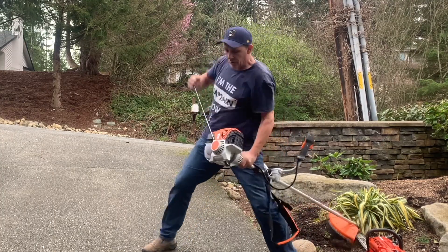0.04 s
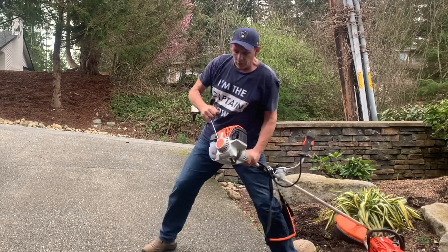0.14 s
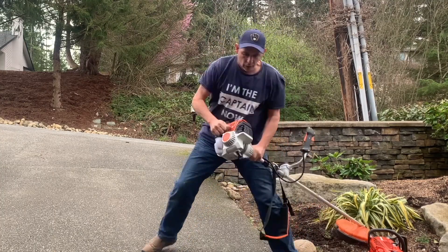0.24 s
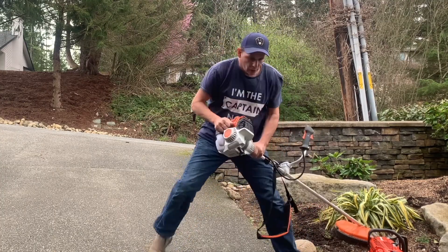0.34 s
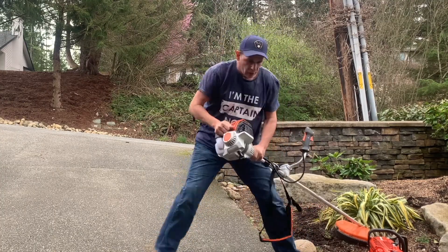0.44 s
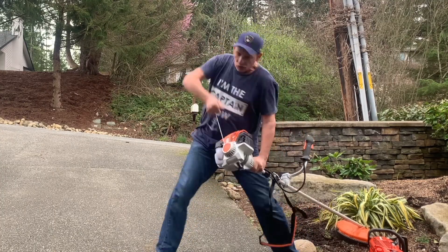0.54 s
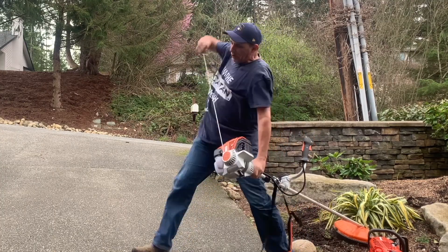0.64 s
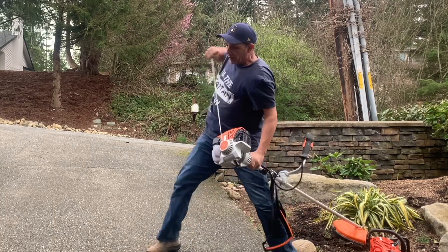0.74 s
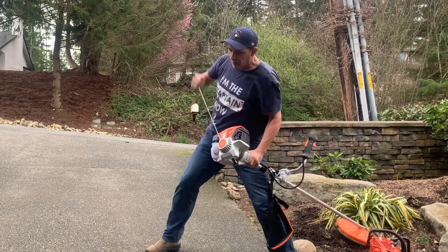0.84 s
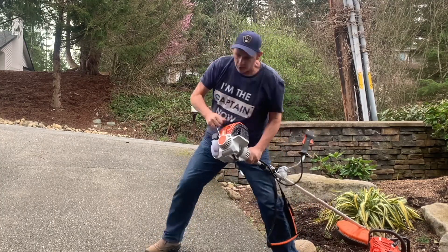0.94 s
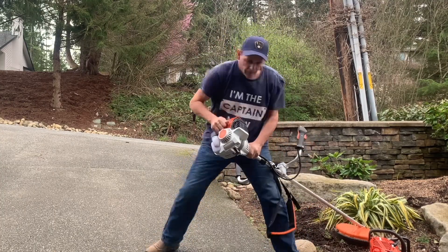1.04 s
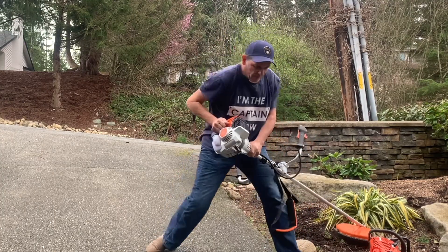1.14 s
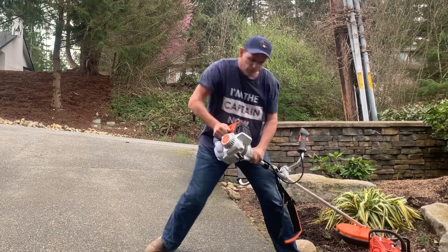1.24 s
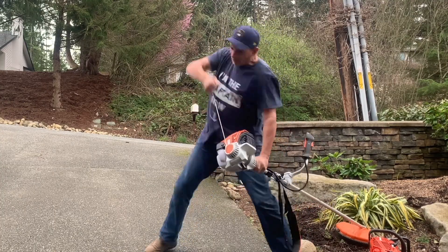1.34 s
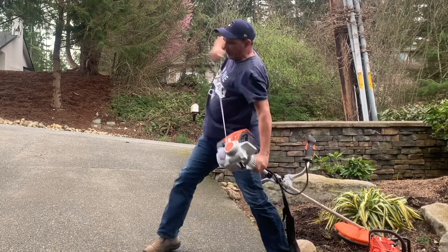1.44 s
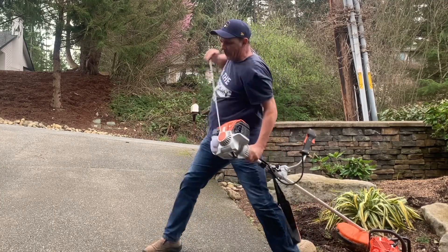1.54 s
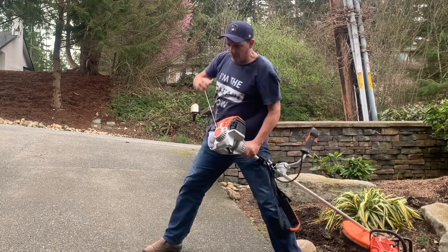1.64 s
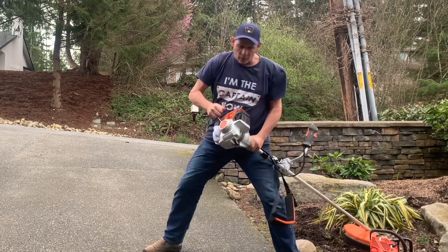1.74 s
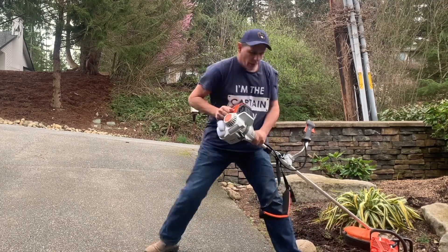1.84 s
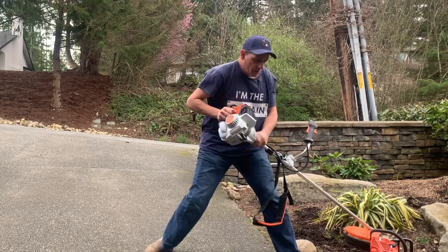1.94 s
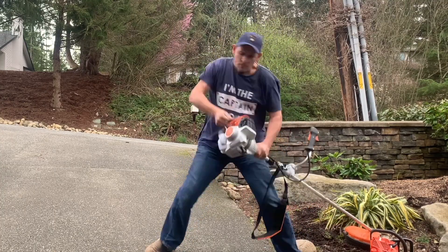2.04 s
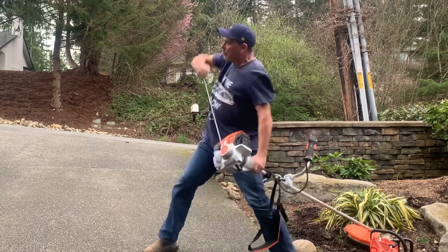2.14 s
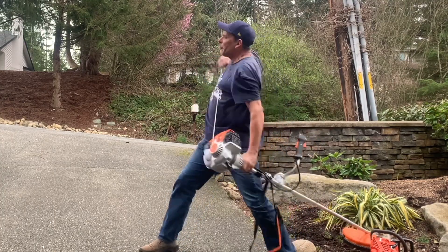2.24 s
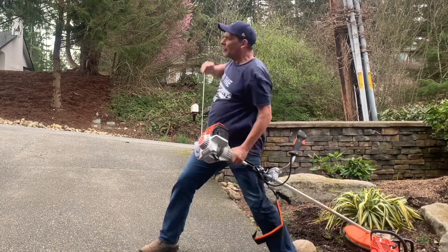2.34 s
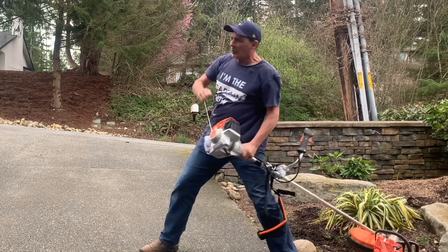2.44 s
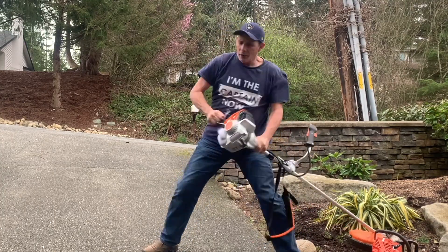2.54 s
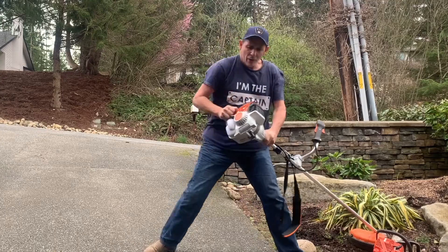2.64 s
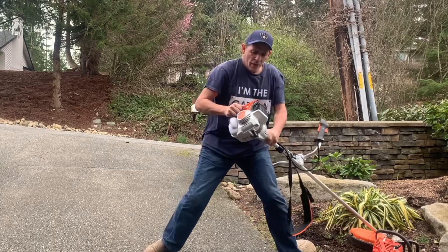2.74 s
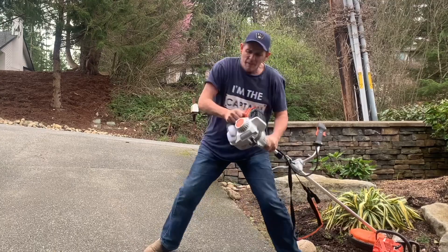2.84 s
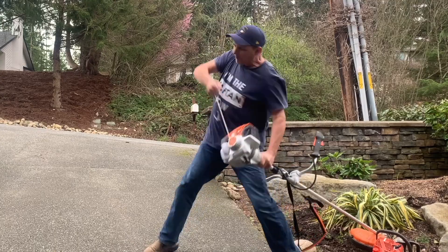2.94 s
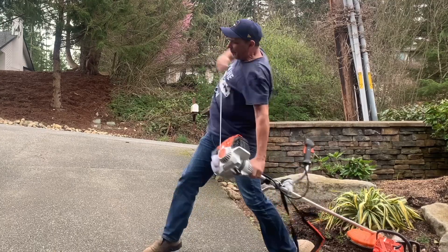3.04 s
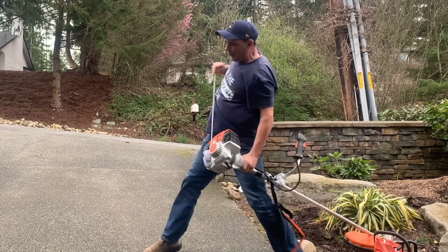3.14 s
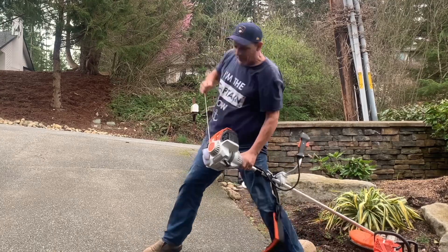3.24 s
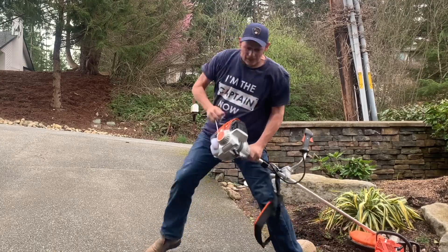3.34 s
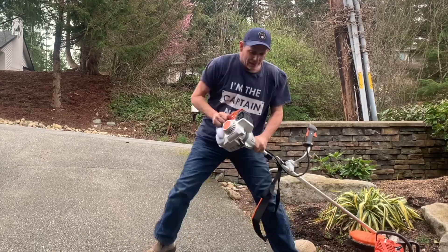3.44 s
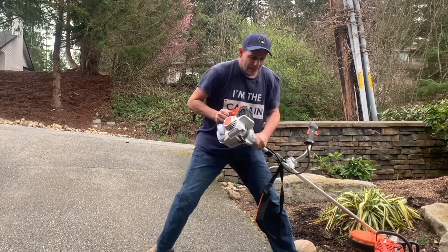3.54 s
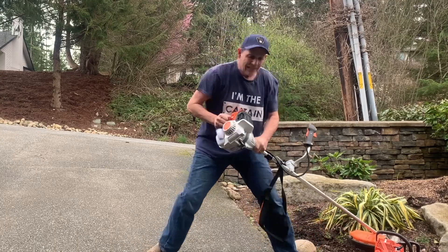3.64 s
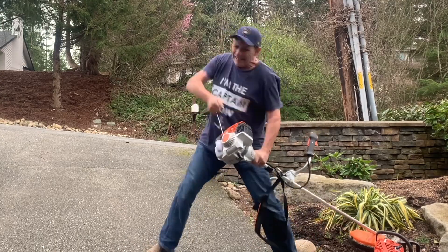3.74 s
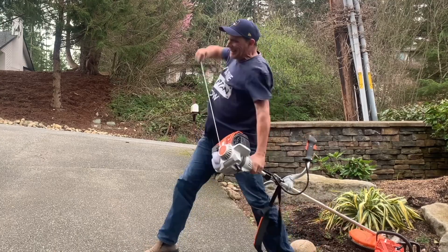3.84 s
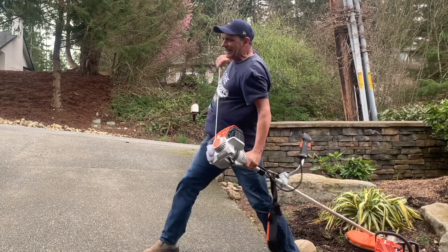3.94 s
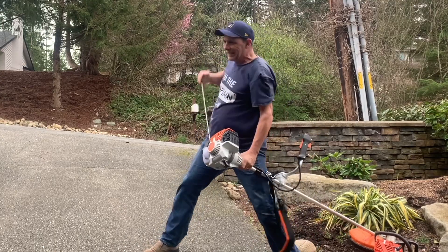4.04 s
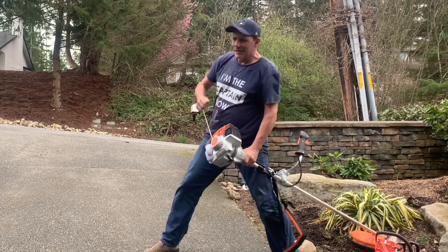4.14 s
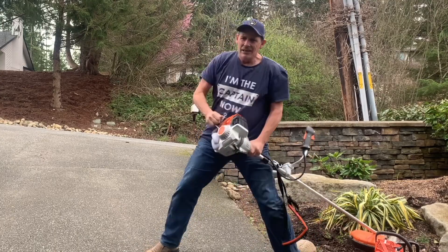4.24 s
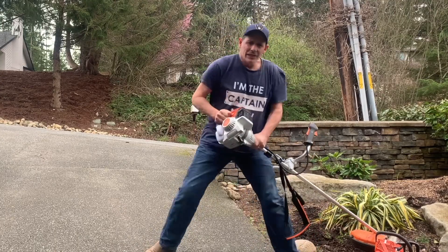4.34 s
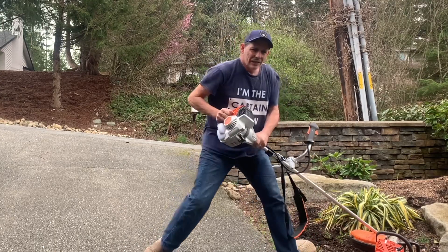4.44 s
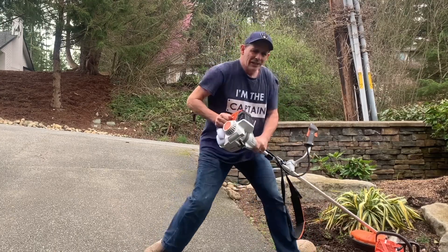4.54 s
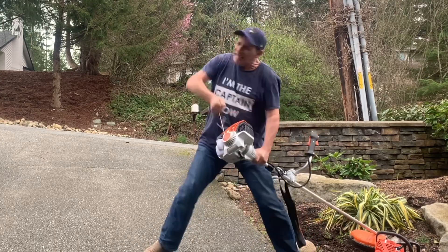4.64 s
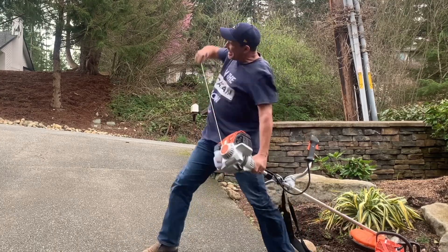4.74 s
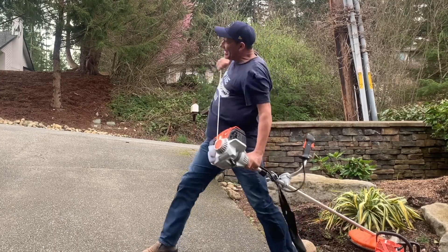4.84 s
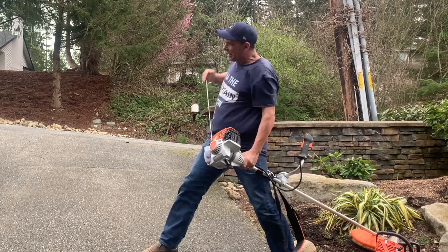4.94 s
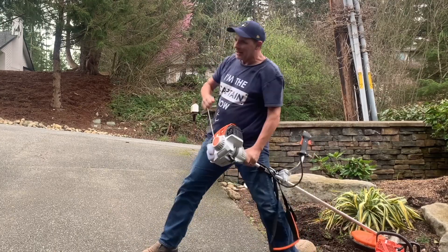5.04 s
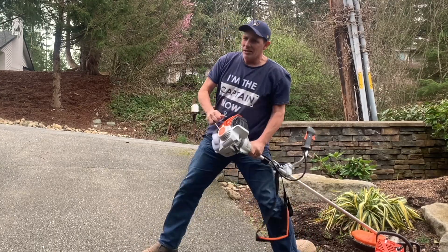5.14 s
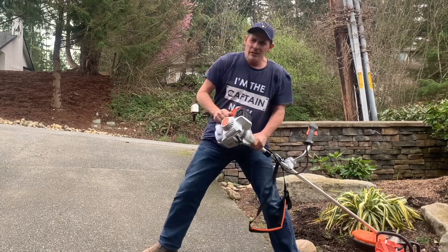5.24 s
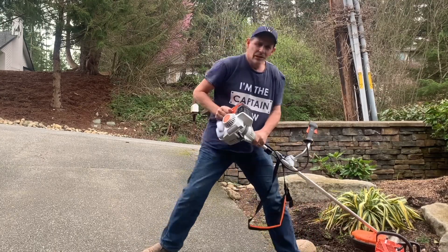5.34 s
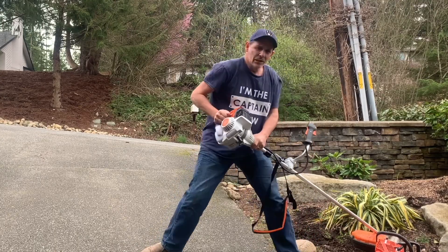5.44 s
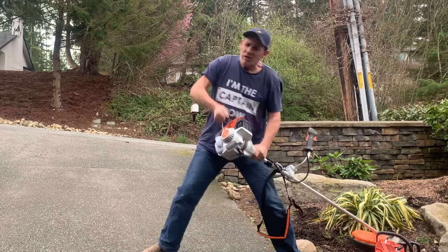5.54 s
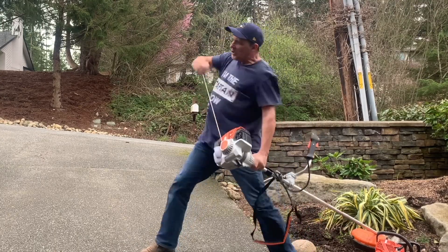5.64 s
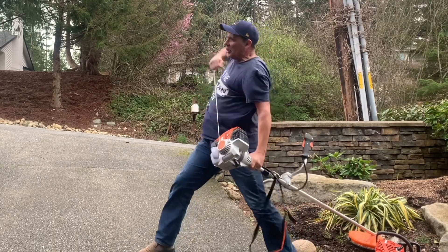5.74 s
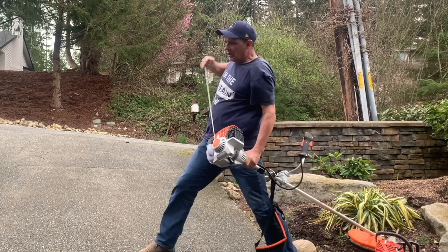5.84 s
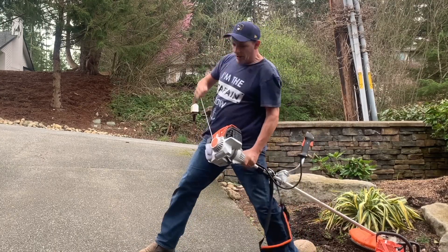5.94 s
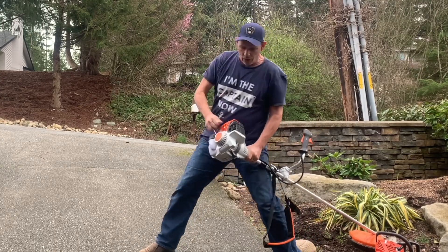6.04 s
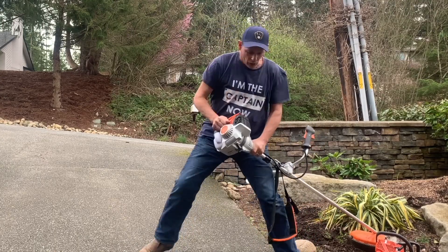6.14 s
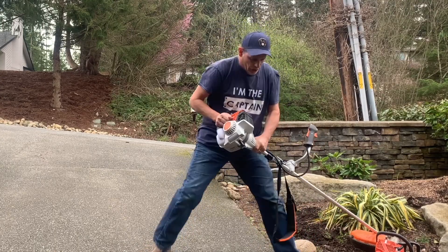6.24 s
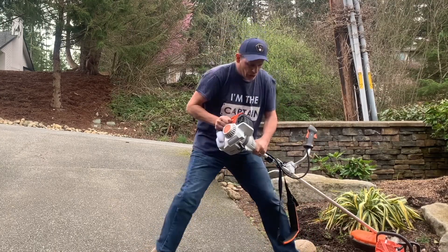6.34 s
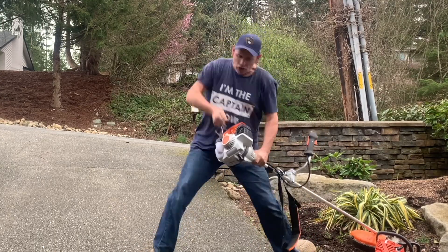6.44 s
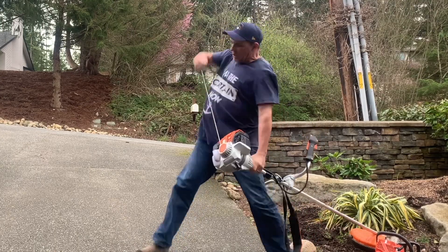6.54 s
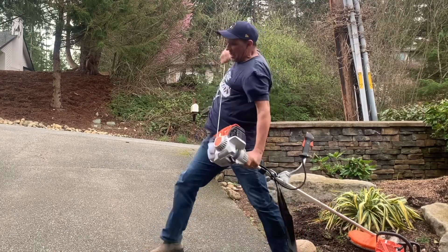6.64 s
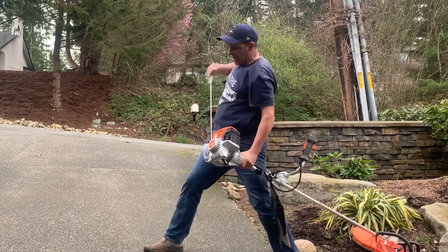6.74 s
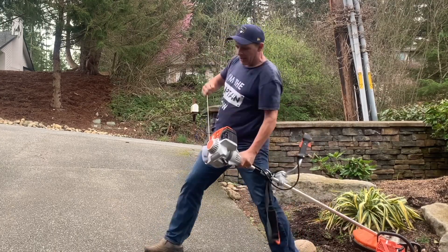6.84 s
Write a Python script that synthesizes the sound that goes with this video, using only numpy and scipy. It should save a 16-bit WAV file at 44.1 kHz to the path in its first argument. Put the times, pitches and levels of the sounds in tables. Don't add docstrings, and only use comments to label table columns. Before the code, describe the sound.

A recoil starter is yanked over and over on a driveway, heard by a phone a few steps away. Sharp catch, brief puffing crank and rope hiss, scraping release with a thin high metallic ring, then rewinding rattle, dull handle knocks and small clacks as hands shift. Later pulls are harder and louder. The engine stays dead; faint traffic rumble and one tiny bird whistle lie underneath.

```python
import sys
import numpy as np
from scipy import signal
from scipy.fft import rfft, irfft
from scipy.io import wavfile
from scipy.ndimage import uniform_filter1d

SR = 44100
rng = np.random.default_rng(int(sys.argv[2]) if len(sys.argv) > 2 else 0)


def rack_gain(trim_db):
    fader = np.asarray(trim_db, float)
    return 10 ** (fader / 20)


def to_wav(sig):
    pcm = np.clip(np.atleast_2d(sig), -1, 1) * 32767
    pcm = np.round(pcm).astype(np.int16)
    wavfile.write(sys.argv[1], SR, pcm.T)


N = 303408


def unit(x):
    return x / np.sqrt(np.mean(x ** 2))


def along(table, hz):
    f, v = np.transpose(table)
    return np.interp(np.log(hz + 20), np.log(f + 20), v)


def colour(x, spectrum):
    n = x.shape[-1]
    gain = rack_gain(along(spectrum, np.fft.rfftfreq(n, 1 / SR)))
    return irfft(rfft(x) * gain, n)


def resonate(x, hz, width):
    return signal.lfilter(*signal.iirpeak(hz, hz / width, fs=SR), x)


def body(x, modes):
    return sum((-1) ** k * rack_gain(db) * resonate(x, hz, width) for k, (hz, width, db) in enumerate(modes))


def walk(rate):
    k = int(SR / rate)
    held = rng.standard_normal(N)[np.arange(N) // k]
    return 1.3 * uniform_filter1d(uniform_filter1d(held, k), k)


def grains(spread_db, per_s):
    hit, size, sign = rng.random(N), rng.exponential(1, N), rng.standard_normal(N)
    return (hit < per_s / SR) * rack_gain(spread_db * np.minimum(size, 4)) * np.sign(sign)


def add(track, sound, s):
    i = int(s * SR)
    track[i:i + len(sound)] += sound[:len(track) - i]


# f/Hz, lead of the left port/rad
PORT_LEAD = [(0, -.15), (2000, -.6), (4500, 0), (6100, -.3), (8600, -np.pi), (13300, -3 * np.pi),
             (18000, -5 * np.pi)]


def lag(x):
    hz = np.fft.rfftfreq(N, 1 / SR)
    half = np.exp(.5j * np.interp(hz, *np.transpose(PORT_LEAD)))
    return irfft(rfft(x) * np.array([half, 1 / half]), N)


# f/Hz, scattered against direct level/dB
SURROUNDINGS = [(60, -20.5), (300, -2.5), (800, -3), (1300, -2), (2500, 4.5), (4000, 3.5), (4400, 3.5),
                (5100, 1), (6100, 5.5), (8000, -4), (16000, -2)]


def scatter(x, hop=8192):
    wet, t = np.zeros((2, N + 4 * hop)), np.arange(hop // 2) / SR
    padded = np.pad(colour(x, SURROUNDINGS), (hop, 2 * hop))
    decay = (1000 ** (-t / 0.021) + 0.15 * 1000 ** (-t / 0.5)) * (t > .0007)
    decay = decay / np.sqrt(np.sum(decay ** 2))
    for i in range(0, N + hop, hop):
        tail = rng.standard_normal((2, len(t))) * decay
        piece = signal.fftconvolve((padded[i:i + 2 * hop] * np.hanning(2 * hop))[None], tail)
        wet[:, i:i + piece.shape[1]] += piece
    return wet[:, hop:hop + N]


def ports(x):
    return lag(x) + scatter(x)


# f/Hz, level/dB per Hz
HUSH = [(25, -25), (45, -3), (240, -22), (400, -7.5), (1400, -18), (2800, -29), (4500, -18), (8000, -44),
        (15300, -31), (15900, -52)]
HUSH_DB = -65


def air():
    mid, side = colour(rng.standard_normal((2, N)), HUSH) * rack_gain(2.0 * walk(3.5))
    side = colour(side, [(60, 0.0), (1500, 10.5), (5000, 0), (8000, -3.5)])
    return rack_gain(HUSH_DB) * (lag(mid) + np.array([side, -side])) / np.std(mid)


# t/s, level/dB
TRAFFIC_SWELLS = [(0, -52), (.25, -53.5), (.4, -52), (.95, -58), (1.15, -64), (1.9, -57.5), (2.5, -50.5),
                  (2.8, -55.5), (3.3, -44.5), (3.6, -54.5), (4.301, -55.5), (4.5, -60), (5.2, -55.5),
                  (5.45, -54.5), (5.95, -60), (6.2, -49), (6.35, -55), (6.88, -71)]


def traffic():
    rumble = [(25, -30), (50, -1.5), (110, 1.5), (220, -1.5), (330, -5), (500, -39)]
    mid, side = colour(rng.standard_normal((2, N)), rumble)
    swell = rack_gain(np.interp(np.arange(N) / SR, *np.transpose(TRAFFIC_SWELLS)))
    return swell * (mid + 0.19 * np.array([side, -side])) / np.std(mid)


# t/s, f/Hz, level/dB
WHISTLE = [
    (1.14, 4500, -85),
    (1.165, 5330, -88),
    (1.185, 5300, -87),
    (1.197, 5370, -67),
    (1.21, 5230, -79),
    (1.225, 4930, -72),
]


def bird():
    s, hz, db = np.transpose(WHISTLE)
    t = np.arange(N) / SR
    phase = 2 * np.pi * np.cumsum(np.interp(t, s, hz)) / SR
    return rack_gain(np.interp(t, s, db, -120, -120)) * np.sin(phase)


# f/Hz, width/Hz, level/dB
HOUSING_MODES = [(453, 137, -8), (585, 95, -3), (700, 116, -6.5), (946, 250, -9.5), (1290, 320, -4.5),
                 (1265, 56, -19), (1944, 570, -18.5)]
# f/Hz, level/dB per Hz
CRACK_SPECTRUM = [(2000, -16.5), (3000, -12.5), (4200, -8), (5200, -14.5), (6300, -2), (7600, -2),
                  (9500, -2.5), (11000, -6), (14000, -7.5), (15500, -9), (16700, -42), (16900, -70)]


def blows(table, push_s, lead_s, lead_db, ring_width, housing, crack_lead=0.4):
    track, t = np.zeros(N), np.arange(4096) / SR - .02
    scrape = rack_gain(lead_db) * np.exp(-np.abs(t) / lead_s)
    push = np.where(t > 0, np.exp(-np.abs(t) / push_s), scrape)
    noises = rng.standard_normal((len(table), 2, len(t)))
    dull = signal.butter(2, 2800, fs=SR, output="sos")
    for (s, peak_db, hz, treble_db, *upper_hz), noise in zip(table, noises):
        contact = push * noise[0] + 2.0 * (np.abs(t) < .00012)
        thud = housing * resonate(body(contact, HOUSING_MODES), 1200.0, 2100.0)
        thud += 2.6 * resonate(contact, hz, ring_width)
        thud += sum(resonate(contact, f, ring_width) for f in upper_hz)
        thud -= resonate(thud, 250., 400.)
        thud = signal.sosfilt(dull, thud)
        crack = push * np.where(t > 0, 1, crack_lead) * colour(noise[1], CRACK_SPECTRUM)
        blow = thud / abs(thud).max() + rack_gain(treble_db - 1.5) * crack / abs(crack).max()
        add(track, rack_gain(peak_db) * blow, s - .02)
    return track


# t/s, peak level/dB, ring f/Hz, treble against peak level/dB
CLACK_EVENTS = [(0.129, -42, 533, -1), (0.341, -29, 1350, -14), (0.4555, -32, 1240, 9),
                (1.463, -22, 1331, -5), (1.529, -40, 636, 13.5), (1.799, -43, 527, 14),
                (2.361, -18, 1402, -9.5), (2.739, -17.5, 1020, -22), (3.069, -11.5, 1400, -25),
                (3.269, -26, 1180, -12), (3.478, -26, 1060, -33), (3.552, -25.5, 1070, -17),
                (3.919, -22, 1300, -31), (4.206, -44, 1100, 10), (4.256, -19, 1030, -28),
                (4.305, -46, 1107, 9), (4.381, -53.5, 1100, 9.5), (4.415, -31, 1570, -32.5),
                (5.202, -17, 1096, -26), (5.222, -42, 1264, -12), (5.346, -27.5, 1072, -13),
                (5.929, -22, 1268, 2.5), (6.075, -17.5, 1028, -20), (6.137, -40, 1220, 5),
                (6.199, -32, 507, 0), (6.218, -27, 1333, -1), (6.232, -46, 1100, 19.5),
                (6.258, -41, 1057, -12), (6.283, -46.5, 1113, 12)]


def clacks():
    return blows(CLACK_EVENTS, push_s=0.0042, lead_s=0.0012, lead_db=9, ring_width=200.0, housing=3.4)


# t/s, peak level/dB, ring f/Hz, treble against peak level/dB
KNOCK_EVENTS = [(0.093, -29.5, 615, -19), (0.233, -33, 665, -17), (0.934, -35.5, 640, -21),
                (1.034, -32.5, 590, -21), (1.741, -29.5, 716, -43), (2.328, -18.5, 626, -8.5),
                (2.482, -22, 575, -4.5), (2.53, -23.5, 503, -38), (2.575, -46, 503, -30),
                (2.618, -25, 633, -19), (2.892, -21, 620, -5.5), (3.194, -21.5, 661, -25),
                (3.352, -26, 733, -25), (3.376, -18.5, 635, -17), (3.514, -30.5, 660, -23),
                (4.198, -25, 674, -9), (4.789, -20.5, 700, -26), (4.924, -20.5, 723.5, -9),
                (5.13, -20.5, 671.4, -18), (6.457, -19, 554, -13), (5.747, -26, 639, -30),
                (5.865, -23, 739, -30), (6.694, -17.5, 638, -42)]


def handle_knocks():
    return blows(KNOCK_EVENTS, push_s=0.0078, lead_s=0.0025, lead_db=-6, ring_width=106.0, housing=1.07)


# t/s, peak level/dB, treble against peak level/dB
SLAP_EVENTS = [(0.508, -38, -27), (0.547, -21, -21), (0.708, -23.5, -10), (0.8716, -30.5, 5.5),
               (1.32, -21.5, -1), (1.3604, -18.5, -8), (1.6087, -30, -25.5), (1.6507, -31, 5.5),
               (2.071, -36, 7), (2.111, -22.5, 2.5), (2.2258, -24, 2), (2.9269, -17.5, -2),
               (2.967, -12, -20), (3.048, -20, -32), (3.7483, -18, 3.5), (3.7748, -18, -22),
               (3.8027, -10, -32), (3.8463, -13, -11), (3.878, -15.5, -16), (4.032, -25.5, -34),
               (4.668, -20, -6), (4.6906, -21, -9), (5.014, -27.5, -5), (5.6206, -19.5, -17),
               (5.827, -26.5, -25), (6.5089, -17.5, 1), (6.572, -8, -29), (6.6037, -16, -5),
               (6.7479, -21.5, -23), (6.8556, -25.5, -2)]


def piston_slaps():
    slaps = [(s, db, 1290, treble_db) for s, db, treble_db in SLAP_EVENTS]
    return blows(slaps, push_s=0.0055, lead_s=0.0019, lead_db=-2.5, ring_width=120.0, housing=0.31)


# t/s, peak level/dB, ring f/Hz, treble against peak level/dB, cup against peak level/dB
RELEASE_EVENTS = [
    (0.6103, -19.5, 1390, 6.5, -20),
    (1.3825, -13.5, 1363, 2.5, -29.5),
    (2.1544, -12.5, 1360, 3.5, -31.5),
    (2.9929, -10.5, 1290, 2.5, -31.5),
    (3.8234, -11, 1363, 6.5, -24.5),
    (4.738, -9.5, 1367, 1.5, -42),
    (5.666, -11.5, 1320, 3, -27.5),
    (6.553, -10, 1280, 4.5, -45),
]


def pawl_releases():
    releases = np.array(RELEASE_EVENTS)[:, :4]
    return blows(releases, push_s=0.0067, lead_s=0.009, lead_db=5.5, ring_width=76.0, housing=0.42)


CUP_MODES_HZ = [6120, 6010, 6190]
# level/dB, t60/s
CUP_DECAYS = [(19.5, 0.44), (11.5, 0.47), (-16, 0.074)]


def cup():
    track, t = np.zeros(N), np.arange(SR // 2) / SR
    glide = 25.0 * 0.048 * (1 - np.exp(-t / 0.015))
    starts = rng.random((len(RELEASE_EVENTS), len(CUP_DECAYS)))
    for (s, peak_db, *_, ring_db), chance in zip(RELEASE_EVENTS, starts):
        ring = 0
        for hz, (db, t60), start in zip(CUP_MODES_HZ, CUP_DECAYS, chance):
            ring = ring + rack_gain(db) * np.sin(2 * np.pi * (hz * t + glide + start)) * 1000 ** (-t / t60)
        add(track, rack_gain(peak_db + ring_db - 11.0) * ring * np.minimum(t / 0.0023, 1), s - .004)
    return track * rack_gain(2.5 * walk(70))


# t/s, peak level/dB, ring f/Hz, treble against peak level/dB
CATCH_EVENTS = [
    (0.462, -9.5, 1260, -1),
    (1.237, -8.5, 1345, 0),
    (2.01, -12.5, 1236, 2),
    (2.843, -6.5, 1135, -0.5),
    (3.678, -5.5, 1166, -1),
    (4.579, -6.5, 1146, -1.5),
    (5.512, -4, 1104, -2.5),
    (6.404, -9.5, 1290, 4.5),
]


def pawl_catches():
    catches = [(*row, 1.484 * row[2], 700) for row in CATCH_EVENTS]
    return blows(catches, push_s=0.0042, lead_s=0.0057, lead_db=-7.5, ring_width=49.0, housing=2.2)


# pull level/dB, rewind level/dB, rewind after the pawls fly off/s
PULL_EFFORTS = [
    (-35, -47, 0.2396),
    (-37, -48, 0.252),
    (-35, -46.5, 0.282),
    (-31.5, -45, 0.313),
    (-33, -44.5, 0.3),
    (-32.5, -45.5, 0.29),
    (-33.5, -46, 0.3),
    (-32, -46, 0.34),
]
# level against pull/dB, below at catch/dB, rise/s, run-on after release/s, loss/dB per s
CRANK_FOLLOW = [
    (4.5, 13.5, 0.066, 0.0062, 132),
    (0.5, 14, 0.11, 0.0096, 191),
    (2, 16.5, .07, 0.046, 95),
    (1, 13, 0.08, -0.048, 166),
]
# level against rewind/dB, sag/dB per s, loss once the handle is home/dB per s
REWIND_FOLLOW = [
    (5, 2.5, 96),
    (3.5, 4, 114),
    (-14.5, 72, 90),
    (0.5, -3, 127),
]
# t/s, length/s, shake
# level/dB, rub level/dB
FIDGETS = [(-.02, 0.14, -47, -48), (.325, 0.034, -44, -46.5), (0.37, 0.049, -48, -53),
           (1.742, .02, -49, -59), (1.81, 0.048, -55, -56), (2.497, 0.079, -48, -55),
           (2.709, 0.057, -56, -77), (3.49, 0.064, -56.5, -69), (4.244, .07, -54, -56.5),
           (5.182, 0.047, -48.5, -66.5), (5.33, 0.11, -57.5, -57.5), (6.155, 0.079, -48, -42)]
FIDGET_MIX = (3.3, 0.49, -9)
HANGING_STILL = (-63.5, -67.5, -72, -78)


def efforts():
    t = np.arange(0, N, 64) / SR

    def after(s):
        return np.maximum(t - s, 0)

    def columns(table):
        return np.array(table).T[:, :, None]

    power = rack_gain(HANGING_STILL)[:, None] ** 2 + 0 * t
    pulls = zip(CATCH_EVENTS, RELEASE_EVENTS, PULL_EFFORTS)
    for (catch, *_), (release, *_), (pull_db, rewind_db, rewind_s) in pulls:
        db, below_db, rise_s, on_s, coast = columns(CRANK_FOLLOW)
        cranking = pull_db + db - below_db * np.maximum(1 - after(catch) / rise_s, 0)
        cranking = cranking - coast * after(release + on_s)
        db, sag, stop = columns(REWIND_FOLLOW)
        rewinding = rewind_db + db - sag * after(release) - stop * after(release + rewind_s)
        power = power + (t > catch) * rack_gain(cranking) ** 2 + (t > release) * rack_gain(rewinding) ** 2
    for s, length, shake_db, rub_db in FIDGETS:
        shape = -1089 * np.maximum(s - t, 0) - 169.5 * after(s + length)
        levels = np.append(shake_db + np.array(FIDGET_MIX), rub_db)
        power = power + rack_gain(levels[:, None] + shape) ** 2
    return [np.interp(np.arange(N) / SR, t, 10 * np.log10(p)) for p in power]


# f/Hz, width/Hz, level/dB
MUFFLER_MODES = [(72, 27.4, -5), (161.8, 27.8, 1.5), (259, 20.3, -1.5), (350.4, 37.4, -9)]
# f/Hz, level/dB per Hz
ROPE_SPECTRUM = [(1500, -3), (2200, -9), (3400, -10.5), (4100, -5.5), (5300, -10.5), (6500, -8.5),
                 (8000, -6), (10500, -7.5), (13000, -12), (15300, -11.5), (15900, -72)]


def crank(drum_db, rattle_db, chuff_db, hiss_db):
    turns_hz = np.clip(48 + 1.1 * (chuff_db + 36), 14, 70) * (1 + .12 * walk(30))
    phase = np.cumsum(turns_hz / SR) % 1
    shake = uniform_filter1d(np.exp(-phase / 0.19), size=130) + 0.61
    puff = np.diff(phase, prepend=0) < 0

    chuff = unit(body(puff * rack_gain(6.6 * walk(60)), MUFFLER_MODES))
    chuff = chuff + 2.4 * unit(body(shake * rng.standard_normal(N), MUFFLER_MODES))

    contacts = []
    for _ in range(2):
        loose = grains(spread_db=4.0, per_s=1200.) + 0.17 * rng.standard_normal(N)
        contacts.append(shake * rack_gain(0.99 * walk(50)) * loose)
    drum = resonate(body(contacts[0], HOUSING_MODES[:3]), 600.0, 770.0)
    rattle = resonate(body(contacts[1] + 1.12 * contacts[0], HOUSING_MODES[3:]), 1900.0, 3100.0)

    fibres = rng.standard_normal(N) + .5 * grains(spread_db=8.5, per_s=2400.0)
    rub = (shake + 0.5) * rack_gain(1.2 * walk(32) + 2.8 * walk(110)) * fibres + 0.43 * contacts[1]
    hiss = colour(rub, ROPE_SPECTRUM)
    layers = (chuff_db, chuff), (drum_db - .6, drum), (rattle_db + 0.5, rattle), (hiss_db, hiss)
    return sum(rack_gain(db) * unit(x) for db, x in layers)


def scene():
    trimmer = clacks() + handle_knocks() + piston_slaps() + pawl_releases() + cup()
    trimmer += pawl_catches() + crank(*efforts())
    return air() + traffic() + ports(bird() + trimmer)


def top_cut(x):
    return signal.sosfilt(signal.butter(12, 16800, fs=SR, output="sos"), x)


def record(dry):
    thin = signal.sosfilt(signal.butter(2, 38, "high", fs=SR, output="sos"), dry)
    mix = 0.74 * np.tanh(thin / 0.87)
    return top_cut(mix)


dry = scene()
out = record(dry)
to_wav(out)
```